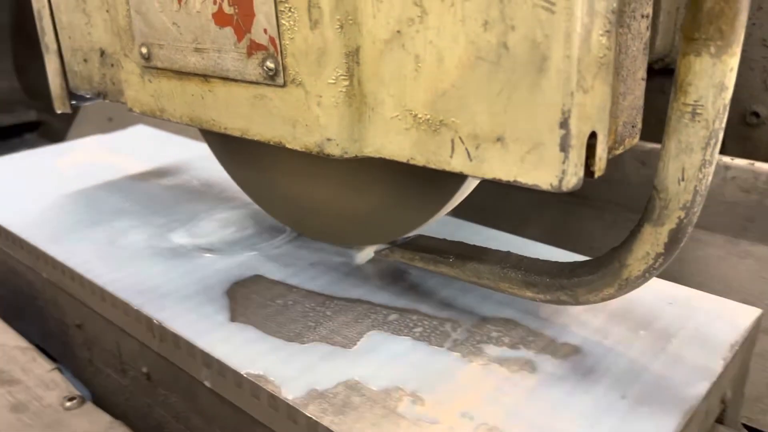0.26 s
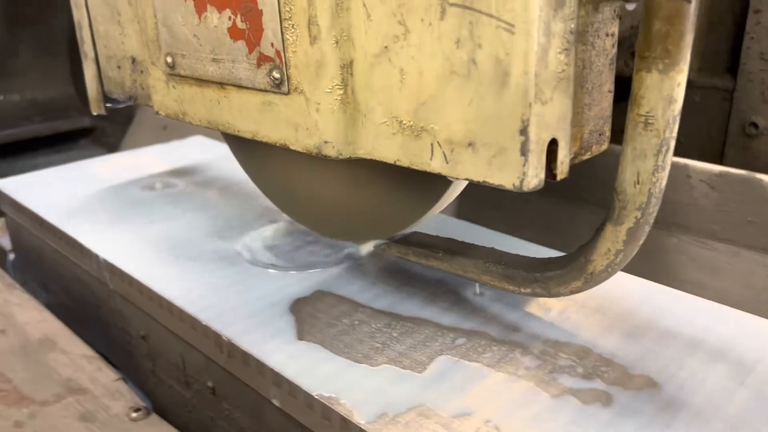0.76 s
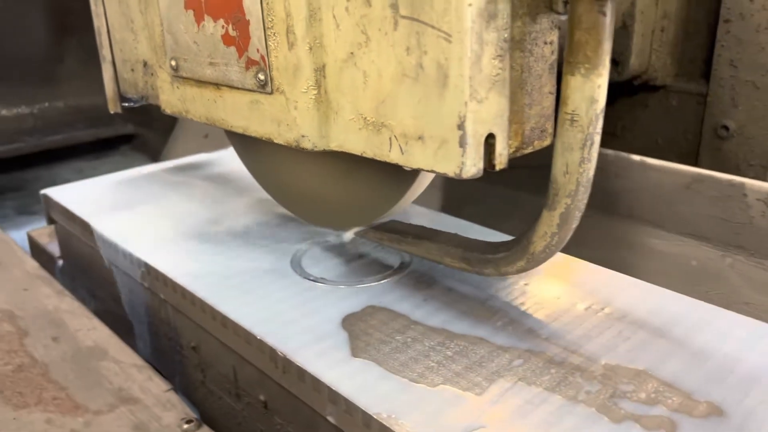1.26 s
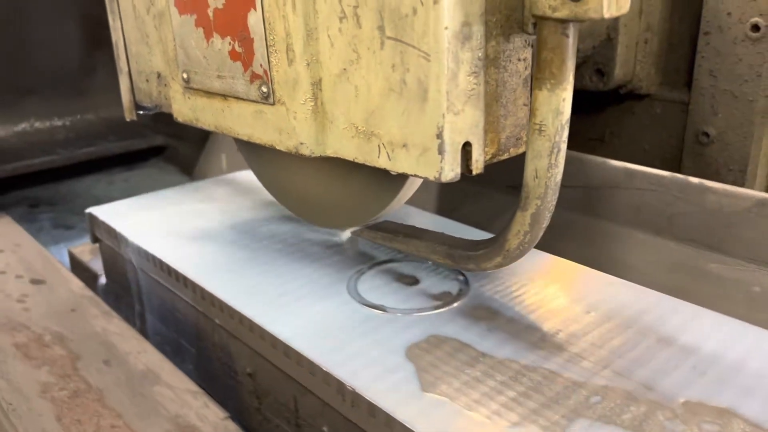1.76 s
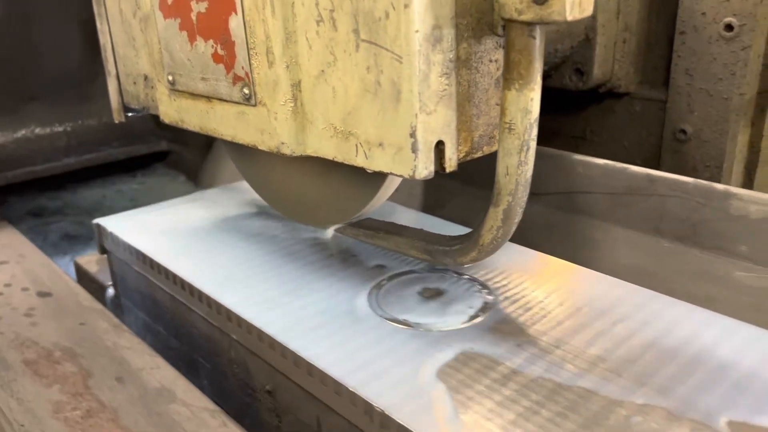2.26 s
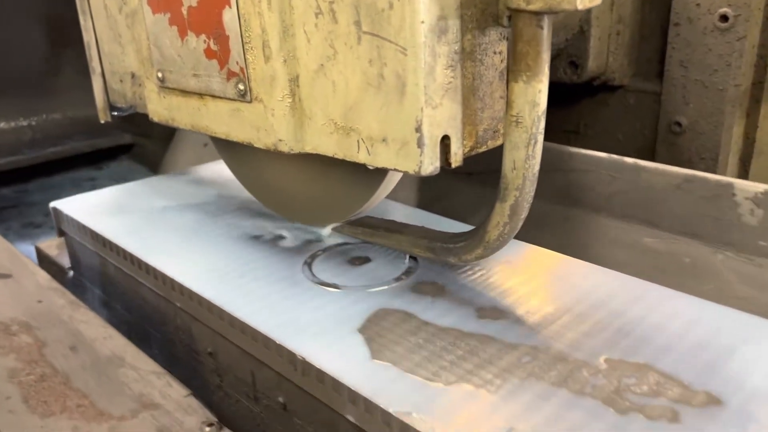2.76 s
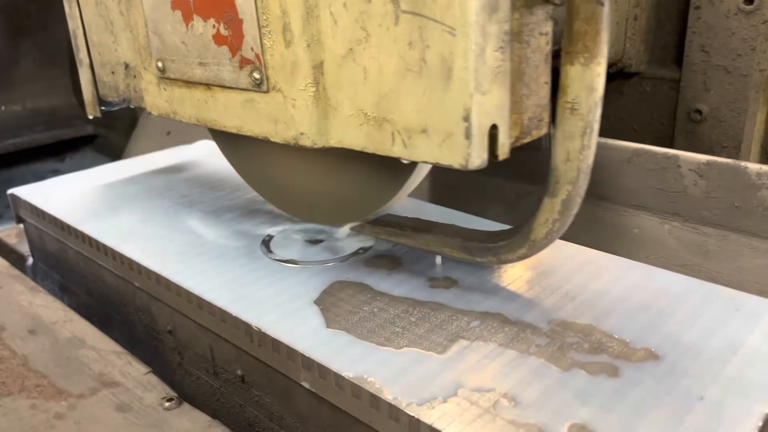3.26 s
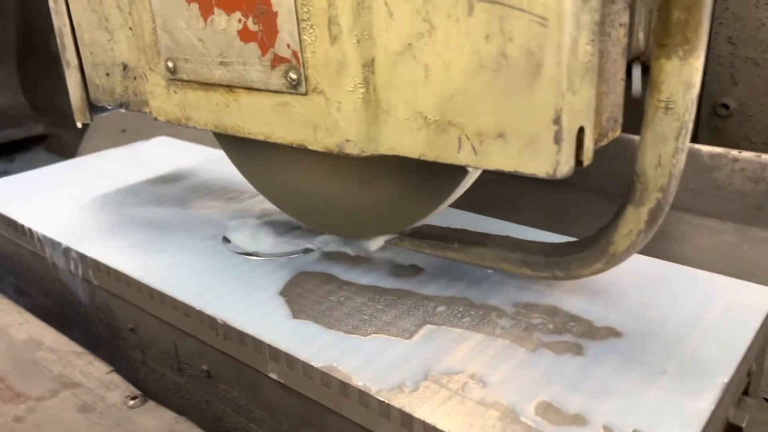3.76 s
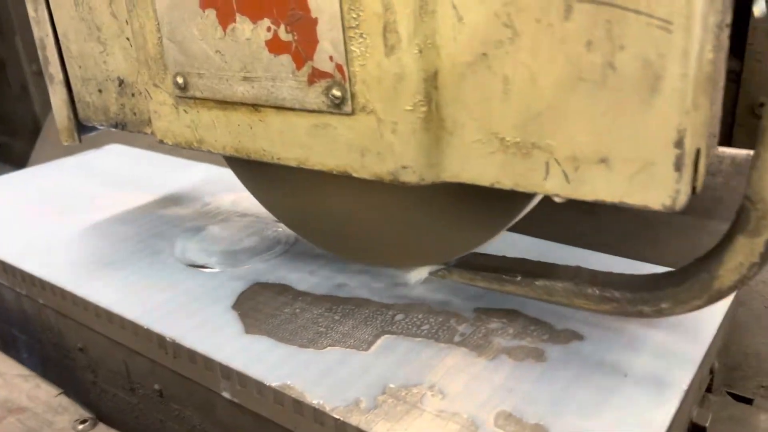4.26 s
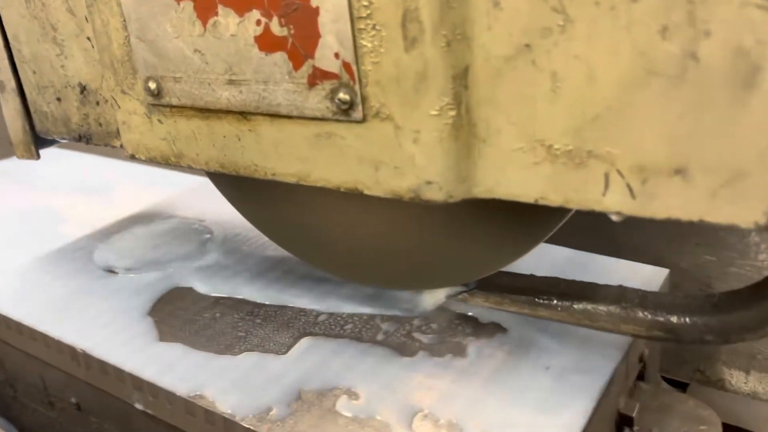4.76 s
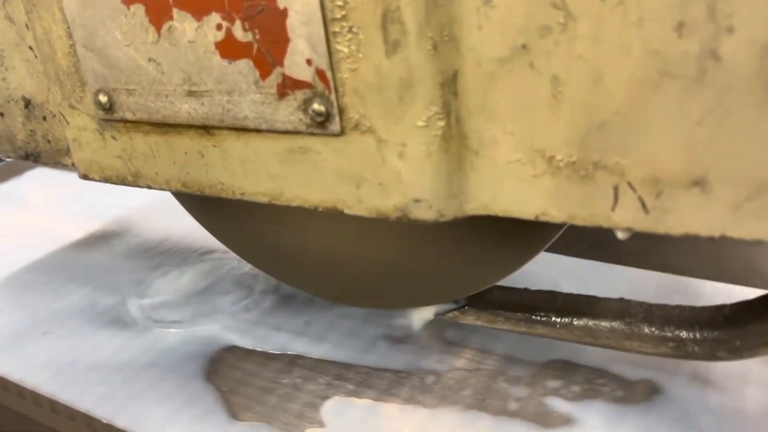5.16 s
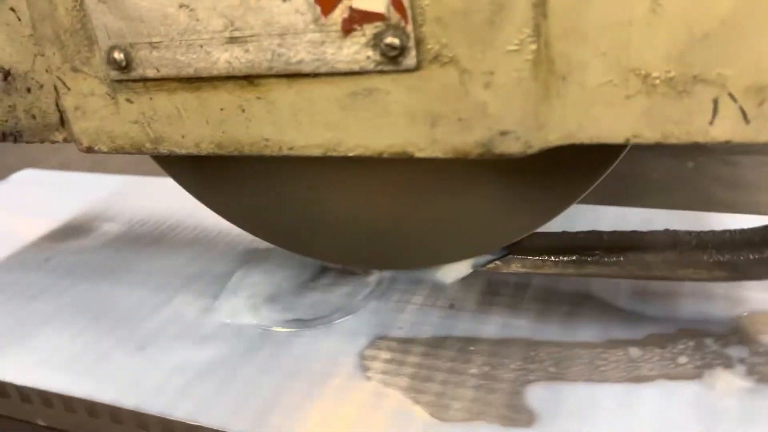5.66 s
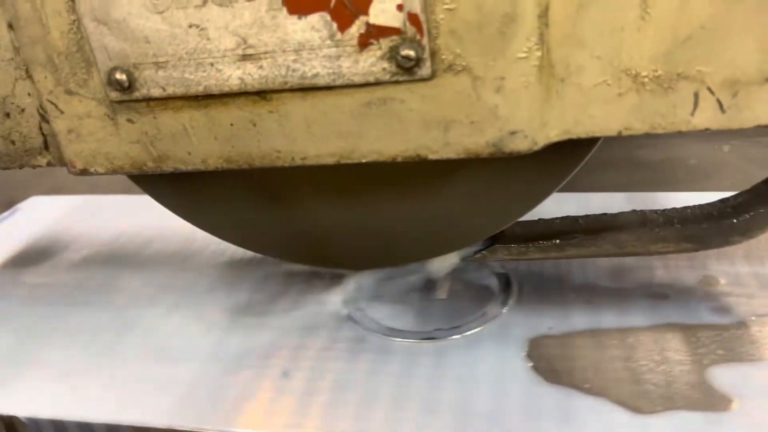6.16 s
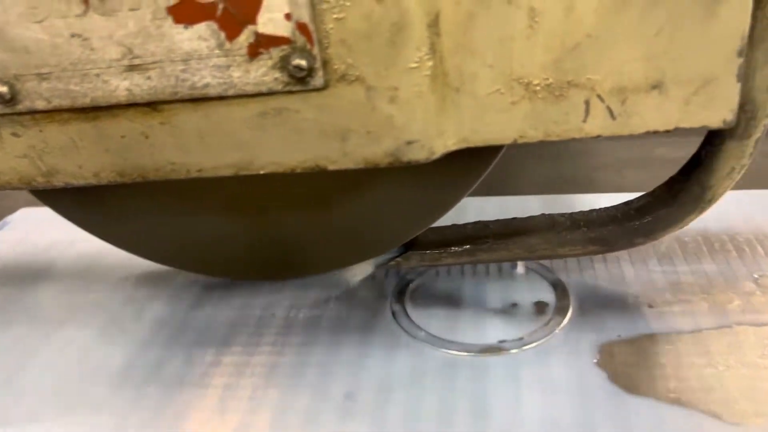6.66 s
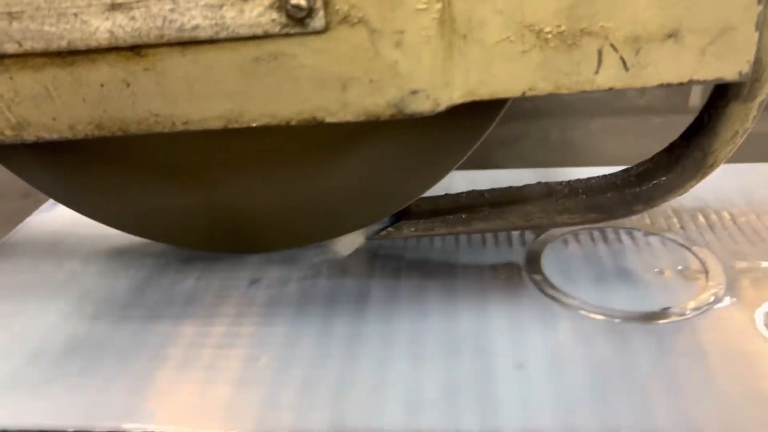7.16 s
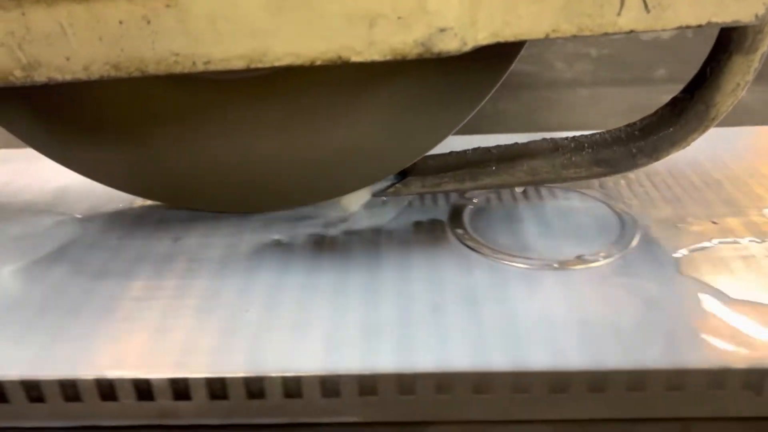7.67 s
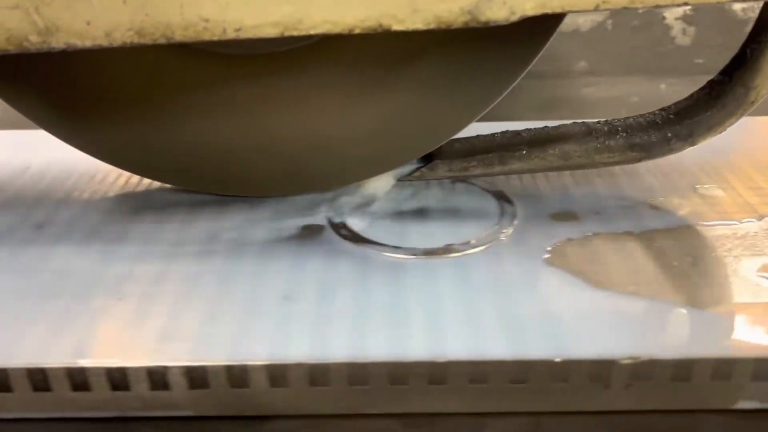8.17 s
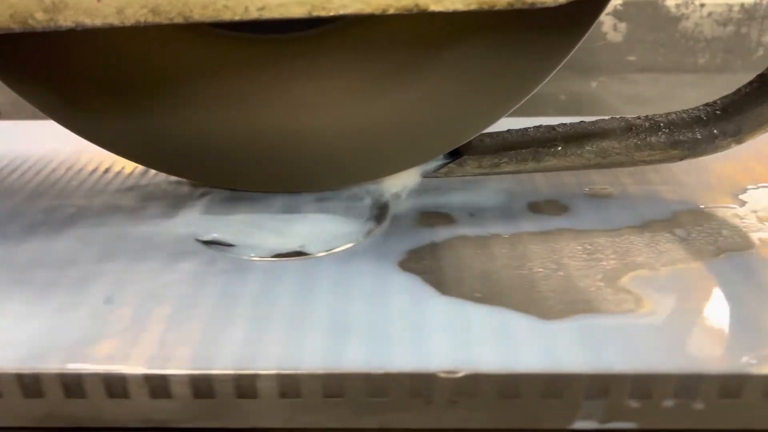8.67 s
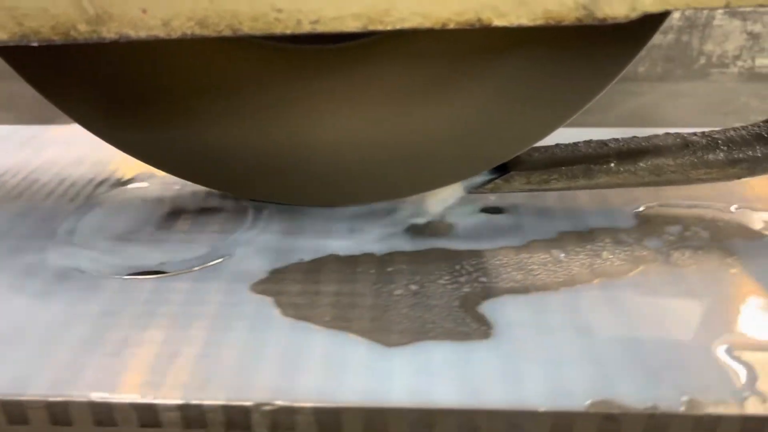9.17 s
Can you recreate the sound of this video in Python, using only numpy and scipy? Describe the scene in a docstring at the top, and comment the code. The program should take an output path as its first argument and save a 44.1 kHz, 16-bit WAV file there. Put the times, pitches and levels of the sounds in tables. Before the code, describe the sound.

A surface grinder hums and whines steadily while its wheel gives brief metallic shrieks over a steel ring, with one hissing, clunking table reversal midway.

```python
"""Surface grinding over a steel ring

A surface grinder skims a flooded steel plate that has a steel ring set into it; motor and pump hum, the
spindle whines: sums of slowly wavering sines over filtered noise. Each pass the wheel bites both rims of the
ring, whose modes sing briefly under friction. At the end of the stroke the hydraulic table gushes (noise),
groans (stick-slip), clunks (struck bed modes) and turns back. Coolant drips tick faintly as short decaying
sines, and the microphone moves in close half way through."""
import sys
import numpy as np
from scipy import signal
from scipy.fft import rfft, irfft, next_fast_len
from scipy.io import wavfile
from scipy.ndimage import uniform_filter1d, map_coordinates

SR = 44100
rng = np.random.default_rng(int(sys.argv[2]) if len(sys.argv) > 2 else 0)


def transcribe(u):
    """Save the signal u as a 16-bit wav file named by the first command-line argument.

    u: samples, shape (n,) or (channels, n), limited to [-1, 1]; the rate is SR.
    q: integer samples, one column per channel.
    """
    v = np.clip(np.atleast_2d(u).T, -1, 1)
    q = np.round(v * 32767).astype(np.int16)
    wavfile.write(sys.argv[1], SR, q)


N = 415422
TIME = np.arange(N) / SR
SIDES = np.array([[.5], [-.5]])  # shares a left-right difference between the two channels

# microphone position: t/s, closeness (0 afar, 1 close by, higher nearer still), left-right/dB
CLOSENESS = [(0, 0.19, -3.5), (1.2, 0, -1.5), (2.2, 0.027, -3), (4.4, 0.16, -1.5), (5.5, 0.62, -3),
             (6.3, 0.77, -1), (7.3, 0.85, 0.5), (8.3, 1.37, -0.5), (9.42, 1.28, -1.5)]
# stereo balance over frequency: f/Hz, left-right/dB
BALANCE = [(60, 0), (200, 0.5), (1200, -3.5), (2400, -2.5), (4000, -2), (5400, -6.5), (6600, -3.5),
           (7500, -1), (15000, 0.5)]
# the wheel on the ring's rims, first and second rim in turn: start t/s, length/s, rise time constant/s,
# level/dB, lean towards the upper mode of each split pair/dB, tilt above 5 kHz/(dB per octave), scrape/dB,
# then the level/dB of the pairs near 2.4, 3.8, 5.5 and 7.5 kHz; all levels relative
BITES = [(0.382, 0.12, 0.011, -3, -8.5, 3.5, -1, -1, -8, 0, -0.5),
         (0.905, 0.072, 0.02, 0.5, -7.5, 3, -3, 1.5, 1, 0, -4.5),
         (3.302, 0.069, .015, -3, -9.5, 4, -1, 1.5, 2, -2, -0.5),
         (3.782, 0.085, 0.018, -3, -10, 7, -2, 1.5, -10, -4, -1.5),
         (5.496, 0.1, 0.018, -0.5, -2, 5, -3, 2.5, 2.5, 2.5, 1),
         (6.051, 0.072, 0.027, 1, -2, 6.5, 0, 1.5, 0, -1, -1),
         (8.406, 0.083, 0.01, -1, 0, 8, 0, 0.5, -1.5, -3, 2),
         (8.917, 0.093, 0.033, -1, 3, 7.5, 4.5, 0.5, 1, 3, 0)]


def amp(db):
    """Level law: decibels to an amplitude ratio."""
    return np.exp(np.asarray(db) * (np.log(10) / 20))


def unit(x):
    """Normalisation of signal power: scale to rms 1."""
    return x / np.sqrt(np.mean(x ** 2) + 1e-20)


def along(points, hz):
    """Logarithmic frequency scale: (f/Hz, value) points read between knots."""
    f, v = np.transpose(points)
    return np.interp(np.log(hz + 1), np.log(f + 1), v)


def curves(rows):
    """Linear interpolation in time: one value per sample for each column after t/s."""
    s, *cols = np.transpose(rows)
    return [np.interp(TIME, s, c) for c in cols]


def wobble(rate):
    """Band-limited random modulation: a smooth curve through rate random knots a second."""
    coarse = TIME[::64]
    knots = rng.standard_normal(int(TIME[-1] * rate) + 4)
    return np.interp(TIME, coarse, map_coordinates(knots, [coarse * rate]))


def filtered(x, response):
    """Linear filtering: the spectrum of x times a complex response of frequency."""
    m = next_fast_len(N + SR // 4, True)
    return irfft(rfft(x, m) * response(np.fft.rfftfreq(m, 1 / SR)), m)[..., :N]


def resonate(x, hz, width):
    """Resonance: one damped mode with a peak gain of 1."""
    return signal.lfilter(*signal.iirpeak(hz, hz / width, SR), x)


def rush(spectrum):
    """Turbulent noise: two unrelated random signals of rms 1 with the given colour."""
    return unit(filtered(rng.standard_normal((2, N)), lambda hz: amp(along(spectrum, hz))))


def spread(pair):
    """Diffuse-field coherence: two unrelated signals become alike in the bass, diffuse in the middle."""
    # f/Hz, left-right likeness
    alike = [(60, 0.95), (130, 0.96), (290, 0.72), (640, 0.069), (1400, 0.13), (3100, 0.4), (6000, 0.052),
             (7400, 0.96), (10000, 1), (15000, 0.94)]

    def turn(hz):
        return np.arccos(np.clip(along(alike, hz), 0, .975)) / 2

    mid, side = filtered(pair, lambda hz: np.array([np.cos(turn(hz)), np.sin(turn(hz))]))
    return filtered(np.array([mid + side, mid - side]), lambda hz: amp(SIDES * along(BALANCE, hz)))


def between(far, near, close):
    """Distance dependence: a value that moves linearly with the microphone's closeness."""
    return far + close * (near - far)


def stroke():
    """Periodic motion: the table's position, 1 at its loud turn and -1 at the other end."""
    stroke_s, turn_s = 5.9, 5.25  # trip there and back; moment of the loud turn
    return np.cos(2 * np.pi * (TIME - turn_s) / stroke_s)


def on_ring():
    """Contact region: 1 with the wheel between the ring's two rims, fading to 0 on the bare plate."""
    fade_s = 0.33
    rims = np.array(BITES)[:, 0]
    passes = zip(rims[::2], rims[1::2])
    outside = np.min([np.maximum(first - TIME, TIME - second) for first, second in passes], axis=0)
    return np.clip(1 - outside / fade_s, 0, 1)


def sing(t, length, hz, width, rough=0.21, ring_out=0.031):
    """Friction-driven vibration: a rubbed mode flutters, grit jolts its phase and strength, it rings out."""
    flutter_db, flutter_rate = 3.4, 105  # the mode catches and slips: depth, slips a second
    contact = np.abs(np.sin(np.pi * np.clip(t / length, 0, 1))) ** 0.16
    decay = np.exp(-np.abs(t - length * 0.75) / ring_out)
    swing = np.where(t < length * .75, contact, decay)
    jolts = rng.standard_normal((2, len(t)))
    # a random walk in phase broadens the line
    jitter = np.cumsum(jolts[0] * contact) * np.sqrt(np.pi * width / SR)
    phase = 2 * np.pi * hz * t + jitter
    scrape = unit(uniform_filter1d(jolts[1], size=300))
    slips = rng.standard_normal(int(t[-1] * flutter_rate) + 2)
    flutter = unit(amp(flutter_db * np.interp(t * flutter_rate, np.arange(len(slips)), slips)))
    return swing * flutter ** contact * (1 + rough * contact * scrape) * np.sin(phase)


def running():
    """Broadband noise: frame rumble, wind of the wheel, hiss of grit on the plate, fizz of coolant mist."""
    # noise spectra: f/Hz, relative level/dB
    rumble_spectrum = [(15, -45), (25, -59), (49, -4.5), (113, -1.5), (150, -5), (183, -4.5), (210, -6),
                       (224, -2.5), (243, -37), (260, -18), (340, -40), (570, -120)]
    wind_spectrum = [(120, -16), (200, -2.5), (311, -5.5), (366, -7), (483, -7), (595, -9), (742, -8),
                     (853, -7), (1000, -5.5), (1130, -8.5), (1290, -12), (1810, -15.5), (1990, -17),
                     (2160, -19), (3200, -32), (4160, -63), (7040, -120)]
    hiss_spectrum = [(1400, -12), (2400, 1), (2700, -2), (3800, -2), (4200, -4), (5200, -1.5), (5800, -4),
                     (7500, -6), (9800, -10.5), (11000, -6.5), (13000, -13.5), (15800, -11)]
    fizz_spectrum = [(5000, -30), (7500, -5), (11000, 5.5), (13000, 2), (15800, -3)]
    # (level/dB from afar, level/dB from close)
    rumble_db, wind_db = (-38, -35), (-29.5, -30.5)
    hiss_db, fizz_db = (-41.5, -42), (-57, -52.5)
    hiss_swing_db = 0.4  # hiss and fizz follow the stroke
    ring_hiss_db, ring_fizz_db = 1, 8.5  # more of both while the wheel is over the ring

    close, aim_db = curves(CLOSENESS)
    over = on_ring()
    rumble = amp(between(*rumble_db, close) + 0.75 * wobble(5.3)) * rush(rumble_spectrum)
    wind = amp(between(*wind_db, close) + 0.93 * wobble(7.4) + SIDES * aim_db) * rush(wind_spectrum)
    grit = 1.2 * wobble(14) + 1.1 * wobble(500)  # dB; single grains catch and break out
    hiss = amp(between(*hiss_db, close) + ring_hiss_db * over) * rush(hiss_spectrum)
    fizz = amp(between(*fizz_db, close) + ring_fizz_db * over) * rush(fizz_spectrum)
    return rumble + wind + amp(hiss_swing_db * stroke() + grit) * (hiss + fizz)


def guard():
    """Flow-excited whistle: the wheel's draught in the guard, fuzzy, wandering in pitch, coming and going."""
    # t/s, level/dB
    guard_level = [(0, -48), (1, -49.5), (3, -48.5), (5.5, -42.5), (6.2, -46), (6.65, -47), (7.05, -42),
                   (7.5, -45), (7.7, -41), (8.05, -47), (8.4, -44.5), (9, -42.5), (9.42, -52)]
    pitch_hz, wander_hz, flutter_rate = 1985, 75 * 0 + 28, 75  # flutter in random knots a second
    flutter = np.array([wobble(flutter_rate) + 1j * wobble(flutter_rate) for _ in SIDES])
    phase = 2 * np.pi * np.cumsum(pitch_hz + wander_hz * wobble(9)) / SR
    whistle = np.real(flutter * np.exp(1j * phase))
    return amp(curves(guard_level)[0]) * unit(amp(2.4 * wobble(11)) * whistle)


def tone(hz, pan_db, lead, waver_db, drift, gain=1):
    """Standing waves: a partial of rms 1 times a complex gain wavers, short waves differently at each port."""
    apart = min(hz / 700, 1) ** 2  # how far the two ports differ
    start = rng.uniform(0, 2 * np.pi)
    phase = 2 * np.pi * hz * TIME + start + drift * wobble(2.5) + np.angle(gain)
    waver = waver_db * (wobble(3.084) + apart * np.array([wobble(1.335), wobble(1.01)]))
    wave = np.sin(phase + SIDES * lead * apart)
    return np.abs(gain) * unit(amp(waver + SIDES * pan_db) * wave)


def shiver(depth, rate=16):
    """Random modulation: complex gain of a note shaken in strength and phase by the changing load."""
    return 1 + depth * (wobble(rate) + 1j * wobble(rate))


def beat(period, crest, depth):
    """Beating: complex gain of a note joined by a weaker one slightly below it."""
    return 1 + depth * np.exp(-2j * np.pi * (TIME - crest) / period)


def standing(places):
    """Nodes and antinodes: gain in dB as the microphone passes those of one note."""
    return sum(db * np.exp(-((TIME - s) / width) ** 2) for s, db, width in places)


def motors():
    """Periodic forcing: hum, beating drone and whine, whose levels change as the microphone comes closer."""
    # steady partials of motor, pump and spindle: f/Hz, level/dB from afar, level/dB from close,
    # left-right/dB, left lead/rad (reduced below 700 Hz)
    partials = [(58.5, -46, -48, 0, 0), (87.1, -48, -44, 1, 0), (119.9, -40.5, -40, 2, 0),
                (175, -45, -47, 2, -2), (209.1, -42, -39, .5, -.5), (255.7, -52, -42, -1.5, 1),
                (274.5, -51, -44, 2, 0), (285.3, -44, -42, -2, .1), (314.9, -54, -48, 0, 0),
                (360, -47, -44, 0, 1), (375.1, -46, -46, 1, 1), (392, -46.5, -60, 0, 3),
                (404.4, -50, -43, 0, -.6), (431.3, -53, -43.5, 3, 3.7), (440.1, -47, -53, -2, 0),
                (466.7, -47.5, -58, -3, 1), (702.5, -50, -51, -3, 1), (808.5, -46.5, -45, -3, 2.4),
                (837.4, -47, -51, -3, 2.5), (855.9, -48, -43, -1, -.4), (921.6, -50, -47, 0, -1),
                (928.6, -44.5, -43, 2, 2), (1006.7, -52, -47, 1, 0), (1059, -56, -46, 0, 0),
                (1141.3, -48.5, -45, -2, -1), (1212.9, -50, -48, 2, 0), (1294, -51.5, -48.5, -4, -1.5),
                (1426.9, -51, -44, 0, 1)]
    # strong notes of motor, pump and spindle: f/Hz, level/dB from afar, level/dB from close, left-right/dB from
    # afar, left-right/dB from close, left lead/rad (reduced below 700 Hz), nodes and crests of the standing
    # wave [t/s, level/dB, half-width/s]
    strong_notes = [(349.9, -43.5, -41, -1, -1, .1, [(.6, -7, 1), (6.95, 6, .25), (8.1, -12, .12), (8.6, 3, .3)]),
                    (541.1, -38.5, -38.5, -4, 4, .1, [(2.2, -12, .7), (6.25, -12, .55), (7.3, 2.5, .4),
                    (8.7, -7, .6)]), (599.9, -37.8, -36.3, 3, -6, -2.1, [(2.25, -8, .5), (3.3, 1.5, .5),
                    (6, 2, .5), (7.55, -17, .55)]), (646.7, -42.5, -43, 2, 2, 0, [(5.9, 3.5, .7),
                    (7.6, -14, .55)]), (826.3, -43.5, -38.3, -2, -2, 0, [(3.8, -3, .5), (5.45, 3, .35)]),
                    (862.3, -44.5, -35.5, 0, 0, -.75, [(6.2, 2.5, 1.1)]),
                    (885.2, -42, -35.7, 4, 5, .4, [(.1, -8, .3), (4.1, -8, .25), (6.3, 4, .25), (8.4, 2, .25)]),
                    (1078.2, -40.7, -33, 3, 3, 1, [(2.2, -8, .55), (5.4, -10, .3), (6.8, -2.5, .8),
                    (8.8, 2.8, .8)]), (1112, -40, -42, -3, -3, 1.9, [(.2, -8, .45), (4.05, -12, .3),
                    (5.45, -5, .2), (7.75, -5, .3)]), (1170.9, -43, -41, 1, 1, 1.5, [(.1, -6, .7),
                    (4.15, -12, .45), (9.1, 4, .35)])]
    # drone of two motors running almost in step: t/s, level/dB
    drone_level = [(0, -32), (1.2, -34), (2, -41.5), (2.8, -38), (3.4, -32.5), (4.3, -31), (5.05, -29.5),
                   (5.4, -31.5), (6.5, -34.5), (7.3, -42.5), (8.2, -32.5), (9, -30), (9.42, -32)]
    # the drone's note: f/Hz, left-right/dB, left lead/rad (reduced below 700 Hz)
    drone_note = (215.5, -1.5, 3.5)
    # a thin high note: f/Hz, level/dB from afar, level/dB from close
    thin_whine = (2028, -47.5, -58)
    thin_swing_db = 4.5  # louder with the table at the loud end of its stroke

    close, aim_db = curves(CLOSENESS)
    out = np.zeros((2, N))
    for hz, far, near, pan, lead in partials:
        out += amp(between(far, near, close)) * tone(hz, pan, lead, waver_db=1.7, drift=0.61)
    for hz, far, near, pan_far, pan_near, lead, places in strong_notes:
        level = amp(between(far, near, close) + standing(places))
        pan = between(pan_far, pan_near, close)
        out += level * tone(hz, pan, lead, waver_db=1.4, drift=0.3, gain=shiver(0.15))
    beating = beat(period=.775, crest=0.36, depth=0.53)  # s, s, second motor over the first
    drone = tone(*drone_note, waver_db=0.5, drift=0.061, gain=beating)
    out += amp(curves(drone_level)[0]) * drone
    hz, far, near = thin_whine
    level = amp(between(far, near, close) + thin_swing_db * stroke())
    out += level * tone(hz, 0, 0, waver_db=1.3, drift=1.2, gain=shiver(0.4))
    return out * amp(SIDES * aim_db)


def ticks(count=110):
    """Impact sound: flung grit and coolant drops tick on the guards, a few clear among many faint."""
    # start t/s, peak level/dB, f/Hz, t60/s
    clear = [(1.775, -32, 5000, .012), (1.937, -37, 5900, .015), (2.12, -33, 5170, .012),
             (2.69, -45, 6400, .012), (4.258, -34, 4500, .025), (4.284, -34, 4760, .015),
             (7.735, -36, 4950, .04), (7.948, -36, 3140, 0.027)]
    when, size, pitch = rng.uniform(size=(count, 3)).T
    faint = np.transpose([when * TIME[-1], -49 + 10 * size ** 2, 3000 * 3.2 ** pitch, np.full(count, .012)])
    out, t = np.zeros(N + SR), np.arange(SR // 3) / SR
    for s, db, hz, t60 in np.vstack([clear, faint]):
        out[round(s * SR):][:len(t)] += amp(db - 60 * t / t60) * np.sin(2 * np.pi * hz * t)
    return out[:N] * amp(SIDES * -3)


def reversal():
    """Turbulent flow: the valve opens, holds and closes, throttling the oil; coolant sprays at the turn."""
    # surges of oil and coolant: start t/s, rise/s, hold/s, gush level/dB, low boom over that/dB,
    # spray level/dB
    surges = [(0.177, .004, 0.063, -26.5, 1, -45), (1.723, 0.098, 0.3, -40, -9, -69),
              (4.595, 0.17, 0.078, -19.5, -5, -30.5), (4.978, 0.0023, 0.21, -22, 0.5, -29.5),
              (5.136, .04, .04, -28.5, 2.5, -41), (6.77, 0.047, 0.76, -36.5, -5, -69)]
    # noise spectra: f/Hz, relative level/dB
    gush_spectrum = [(47, -45), (80, -26), (124, -1.5), (156, -28), (211, -1), (318, -14), (444, -2),
                     (486, -12.5), (592, -3.5), (679, -11), (860, -16), (1040, -12.5), (1380, -21),
                     (2020, -23), (2250, -39), (3000, -38), (3900, -60), (6600, -120)]
    spray_spectrum = [(1500, 0.5), (2500, 0.5), (4000, -2), (5200, 2.5), (7500, 2), (10000, -3),
                      (15800, -5.5)]
    fall_db_per_s, boom_below_hz = 125, 300

    gush, boom, spray = np.zeros((3, N))
    for start, rise, hold, gush_db, boom_db, spray_db in surges:
        age = TIME - start
        closing = amp(-fall_db_per_s * np.maximum(age - rise - hold, 0))
        flow = np.clip(age / rise, 0, 1) ** 0.79 * closing
        gush += flow * amp(gush_db)
        boom += flow * amp(gush_db + boom_db)
        spray += flow * amp(spray_db)
    oil = amp(1.7 * wobble(60) + SIDES * 2.6) * rush(gush_spectrum)
    low = filtered(oil, lambda hz: hz < boom_below_hz)
    coolant = amp(1.7 * wobble(300)) * rush(spray_spectrum)
    return gush * (oil - low) + boom * low + spray * coolant


def slideways():
    """Stick-slip: the table groans and squeals on its ways as it brakes and pulls away."""
    # start t/s, length/s, level/dB, f/Hz, phase jitter/Hz (larger is rougher)
    slip_events = [(.19, .085, -28, 395, 18), (.215, .04, -31, 580, 40), (1.81, .3, -35, 442, 6),
                   (4.655, .04, -29, 955, 15), (4.7, .06, -39, 5050, 200), (4.72, .03, -36.5, 3800, 40),
                   (4.742, .14, -20, 445, 8), (4.75, .11, -25, 595, 30), (4.8, .045, -37, 3800, 45),
                   (4.8, .05, -26.5, 1195, 40), (4.82, .06, -37, 4900, 120), (4.842, .045, -34.5, 3060, 16),
                   (4.998, .036, -16, 212, 8), (5, .03, -21, 405, 15), (5.035, .04, -20, 570, 25),
                   (5.06, .055, -25, 1250, 50), (5.128, .035, -23, 910, 70), (5.15, .06, -33, 1980, 50)]
    rise_s, pan_db = 0.0057, 3.5  # build-up time constant; left-right
    out, t = np.zeros(N + SR), np.arange(SR // 2) / SR
    for s, length, db, hz, width in slip_events:
        swell = 1 - np.exp(-t / rise_s)
        out[round(s * SR):][:len(t)] += amp(db) * swell * sing(t, length, hz, width, ring_out=0.012)
    return out[:N] * amp(SIDES * pan_db)


def clunks():
    """Impulse excitation: the drive takes up its slack in blows and thumps that rattle and ring the bed."""
    # start t/s, relative level/dB, time to fall 20 dB/s, dull above f/Hz
    clunk_events = [(.179, -39, 0.026, 3000), (4.981, -15.5, 0.071, 6000), (5.008, -18, 0.029, 260),
                    (5.115, -27, .04, 240), (5.191, -28, 0.027, 900)]
    # modes of the machine bed: f/Hz, width/Hz, relative level/dB
    bed_modes = [(119.8, 26, -9), (198, 20, 11), (440, 57, -1.5), (646, 91, 2), (790, 100, 8),
                 (946, 90, 12.5), (1410, 560, -6), (3080, 390, -12), (6000, 5000, -29)]
    blow_db, rattle_db = 41, 12
    force = np.zeros((2, N))
    for s, db, length, dull_hz in clunk_events:
        age = np.maximum(TIME - s, 0)
        decay = amp(db + rattle_db - 20 * age / length) * (age > 0)
        knock = decay * rng.standard_normal((2, N))
        knock[:, round(s * SR)] += amp(db + blow_db) * np.array([1, .35])  # the blow lands left of centre
        force += signal.lfilter(*signal.butter(1, dull_hz, fs=SR), knock)
    out = np.zeros((2, N))
    for k, (hz, width, db) in enumerate(bed_modes):
        out += (-1) ** k * amp(db) * resonate(force, hz, width)  # neighbouring modes in opposite phase
    return out


def grazes():
    """Single-mode excitation: light touches set modes going; the ring sings faintly from rim to rim."""
    # start t/s, length/s, level/dB, f/Hz, phase jitter/Hz (larger is rougher)
    graze_events = [(.762, 0.29, -47, 11140, 20), (1.45, 0.061, -45, 6170, 9),
                    (2.006, .059, -43, 7305, 8.3), (2.017, 0.24, -49, 3800, 18), (3.212, .07, -45, 7340, 9),
                    (3.92, 0.04, -43, 6900, 9), (5.33, 0.11, -47, 5652, 15), (5.6, .07, -43, 7700, 15),
                    (6.08, 0.48, -44, 1880, 5), (8.465, 0.067, -40, 7305, 13),
                    (8.472, 0.045, -39, 5652, 17), (8.98, 0.051, -32, 7655, 12)]
    # modes that go on singing between the rims: f/Hz, level/dB from afar
    linger_modes = [(5356, -49), (7305, -54)]
    linger_close_db, linger_past_s = -8, 0.23  # change from close by; time past the second rim
    linger_jitter_hz = 25

    close = curves(CLOSENESS)[0]
    events = list(graze_events)
    for first, second in zip(BITES[::2], BITES[1::2]):
        start = first[0]
        length = second[0] - start + linger_past_s
        for hz, db in linger_modes:
            level = db + linger_close_db * close[round(start * SR)]
            events.append((start, length, level, hz, linger_jitter_hz))
    out, t = np.zeros((2, N + SR)), np.arange(SR) / SR
    for s, length, db, hz, width in events:
        gain = amp(db + SIDES * along(BALANCE, hz))
        out[:, round(s * SR):][:, :len(t)] += gain * sing(t, length, hz, width)
    return out[:, :N]


def ring():
    """Modal excitation: each rim drives all modes; the contact point weights each split pair and its lean."""
    # modes of the steel ring: f/Hz, width/Hz (sets phase jitter and damping), relative level/dB,
    # left-right/dB
    ring_modes = [(1450, 60, -34, -5.0), (1560, 70, -35.5, -5.0), (2331, 24, -36.5, 4.0),
                  (2503, 30, -45.9, 0.0), (3680, 140, -37.5, -4.0), (3895, 80, -40, -3.0),
                  (5356, 20, -36.6, -7.0), (5652, 20, -38.5, -12.0), (5814, 30, -51.2, -8.0),
                  (7305, 16, -37.6, 0.0), (7655, 28, -41.6, -1.0), (8220, 110, -49.7, -1.0),
                  (9453, 22, -40.8, 0.0), (9679, 40, -47.7, -0.0), (9851, 25, -45.1, -0.0),
                  (11003, 140, -49.5, -0.0), (11736, 120, -45.5, -0.0), (12204, 120, -47, 0.0),
                  (13964, 40, -45.6, -0.0), (14163, 60, -46.8, 0.0), (14680, 25, -53.0, 0.0),
                  (2950, 300, -47, -2), (4300, 400, -48, -2), (6600, 500, -49, -3)]
    # close pairs of modes: row of the lower mode, row of the upper mode
    split_pairs = [(2, 3), (4, 5), (6, 7), (9, 10)]
    scrape_level, rasp_level, spark_level = -48.5, -32, -32  # dB: broad scrape, low treble, sizzle of sparks
    sing_db = 2.5  # raises all ringing modes
    ring_out_s, damped_width_hz = 0.039, 130  # decay time of a sharp mode; width at which it is halved
    grain_db, grain_rate = 3.5, 760  # single grains tear through the steel: depth, grains a second
    judder_db, judder_rate = 1.4, 140  # the wheel grips unevenly: depth, grips a second

    out = np.zeros((2, N + SR))
    t = np.arange(SR // 3) / SR
    pairs = np.array(split_pairs)
    for s, length, rise, db, lean_db, tilt_db, scrape_db, *pair_db in BITES:
        touch_db = np.zeros(len(ring_modes))
        touch_db[pairs] = np.array(pair_db)[:, None] + lean_db * np.array([-.5, .5])
        swell = 1 - np.exp(-t / rise)
        contact = np.abs(np.sin(np.pi * np.clip(t / (0.99 * length), 0, 1))) ** 0.26
        grit = rng.standard_normal((2, len(t)))
        scrape = amp(scrape_level) * grit
        scrape += amp(rasp_level) * resonate(grit, 2340, 1600)
        scrape += amp(spark_level) * resonate(grit, 11600, 1900)
        sound = contact * amp(scrape_db + grain_db * wobble(grain_rate)[:len(t)]) * scrape
        for k, (hz, width, level, pan_db) in enumerate(ring_modes):
            colour = touch_db[k] + tilt_db * max(np.log2(hz / 5000), 0)
            gain = amp(level + sing_db + colour + SIDES * pan_db)
            decay_s = ring_out_s / (1 + width / damped_width_hz)
            sound += gain * swell * sing(t, length, hz, width, ring_out=decay_s)
        judder = judder_db * contact * wobble(judder_rate)[:len(t)]
        out[:, round(s * SR):][:, :len(t)] += amp(db + judder) * sound
    return out[:, :N]


def scene():
    """Superposition: tones, ring, ticks and slideways arrive directly; the noises and clunks fill the shop."""
    direct = motors() + ring() + grazes() + slideways() + ticks()
    return direct + spread(running() + guard() + reversal() + clunks())


def record(dry):
    """Phase difference: the two ports drift apart in the treble; nothing is kept above the band limit."""
    # phase between the ports: f/Hz, left lead/rad
    port_lead = [(7400, 0), (8200, .6), (9100, 2.8), (10000, 3.5), (11300, 6), (12400, 6.6), (13700, 9.1),
                 (15000, 9.7), (15800, 11)]
    top_hz = 15850
    return filtered(dry, lambda hz: np.exp(1j * SIDES * along(port_lead, hz)) * (hz < top_hz))


dry = scene()
out = record(dry)
transcribe(out)
```